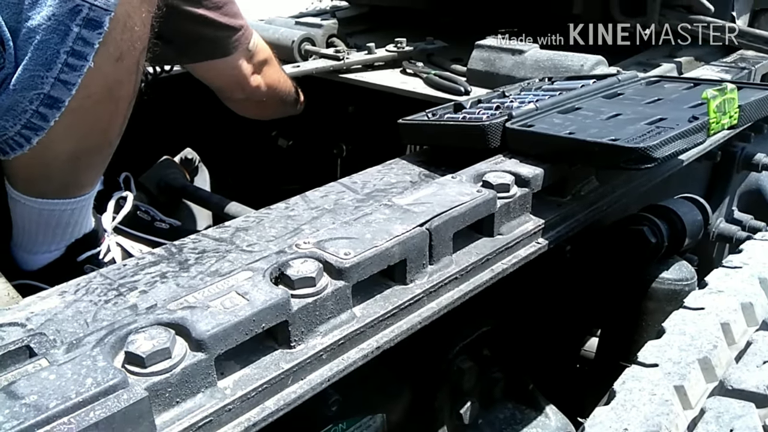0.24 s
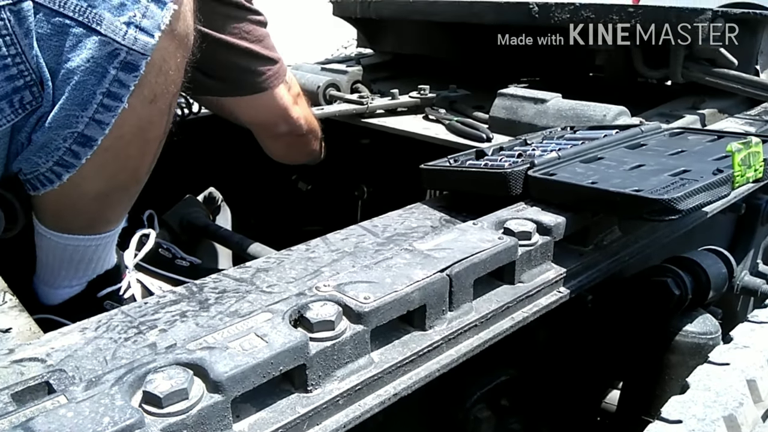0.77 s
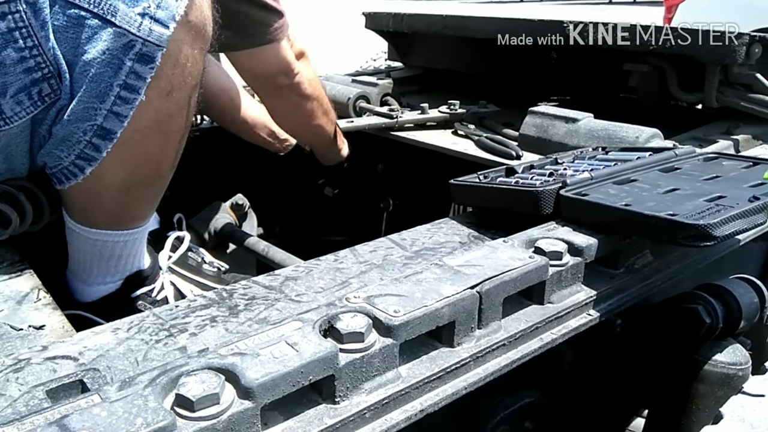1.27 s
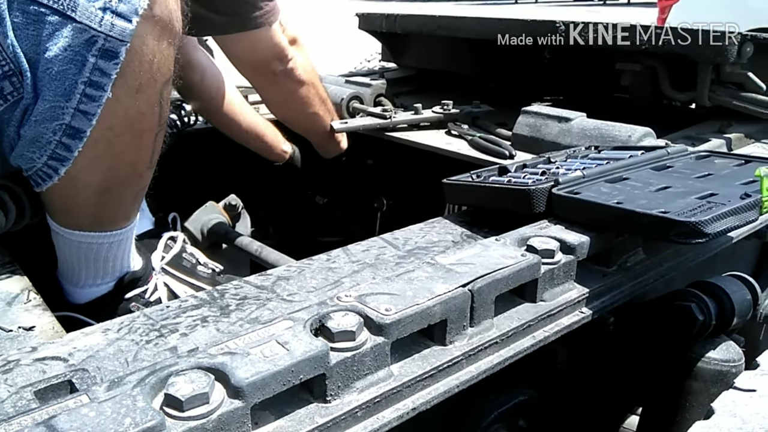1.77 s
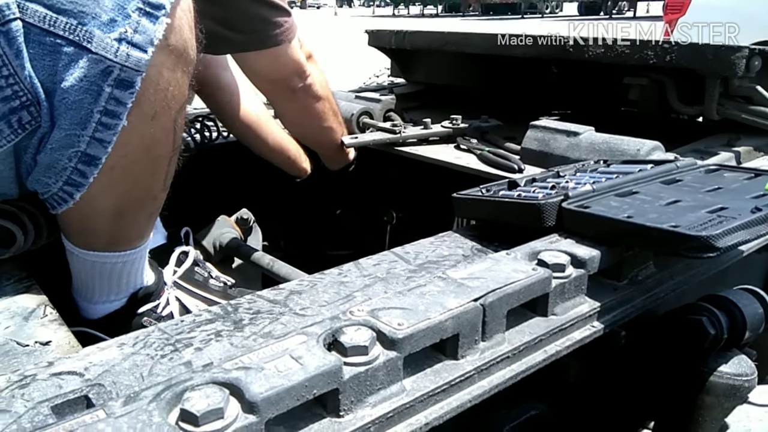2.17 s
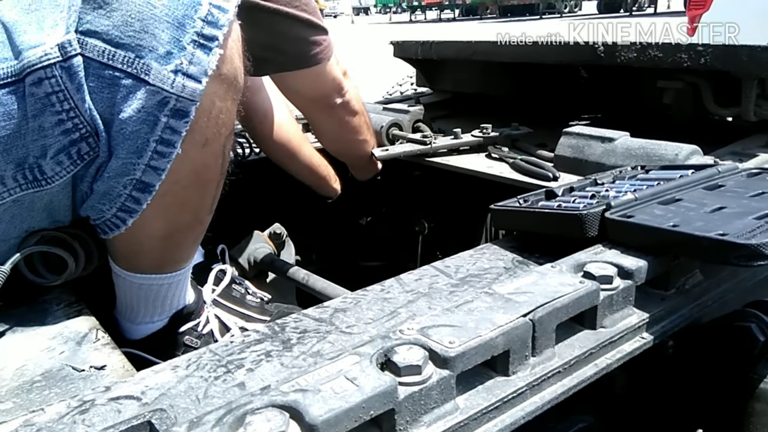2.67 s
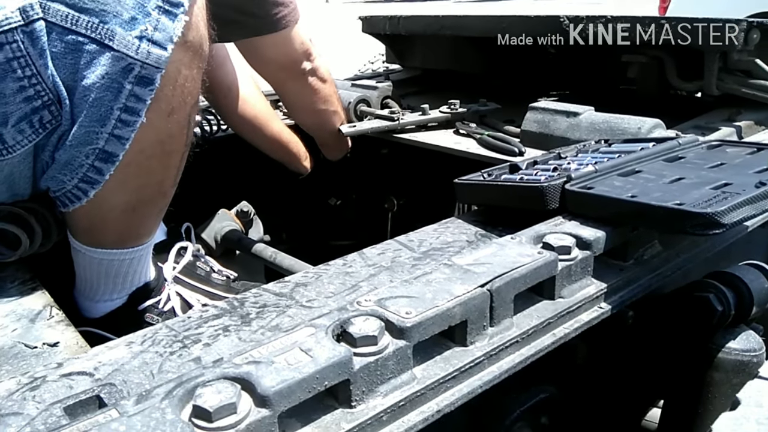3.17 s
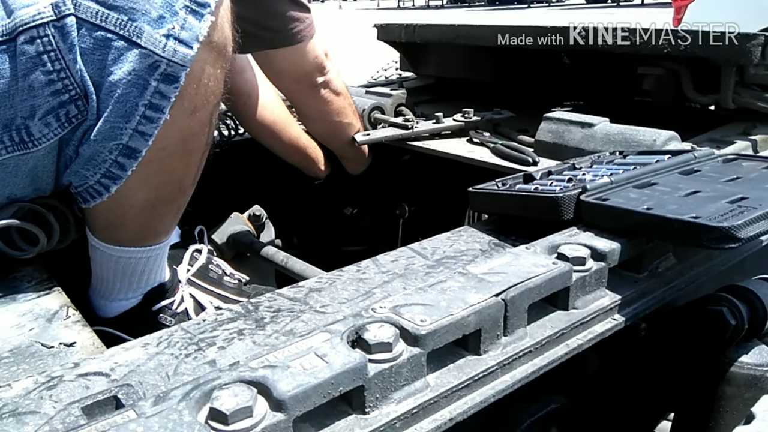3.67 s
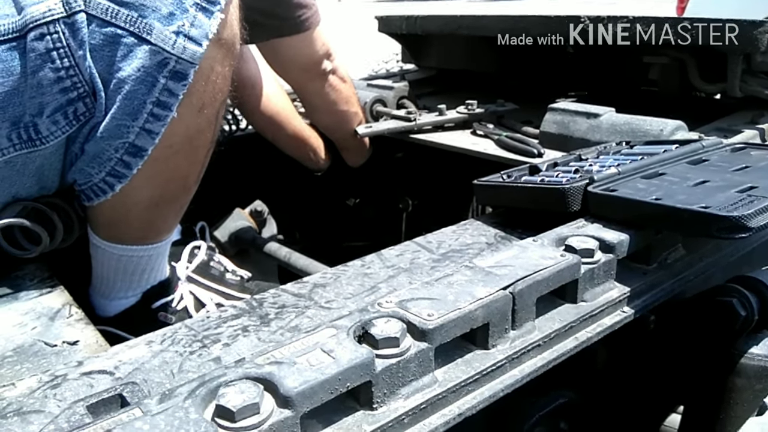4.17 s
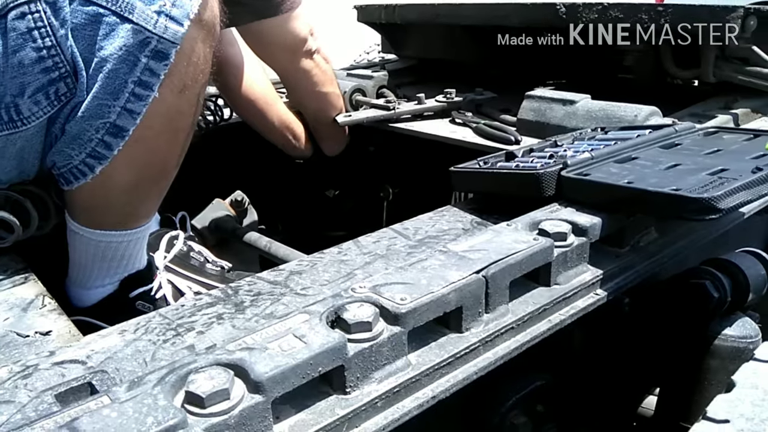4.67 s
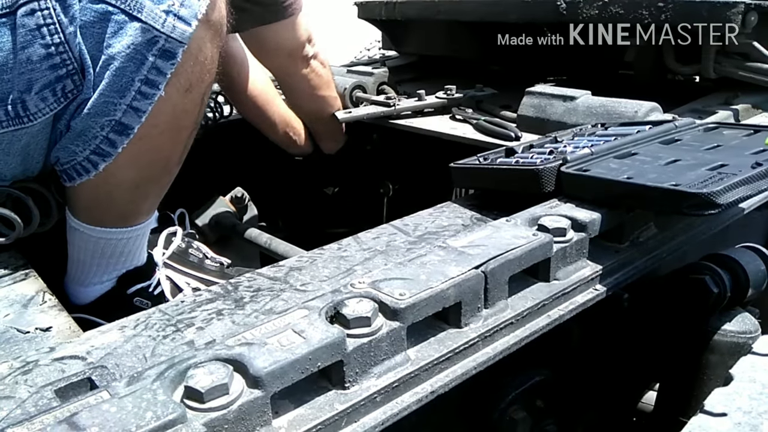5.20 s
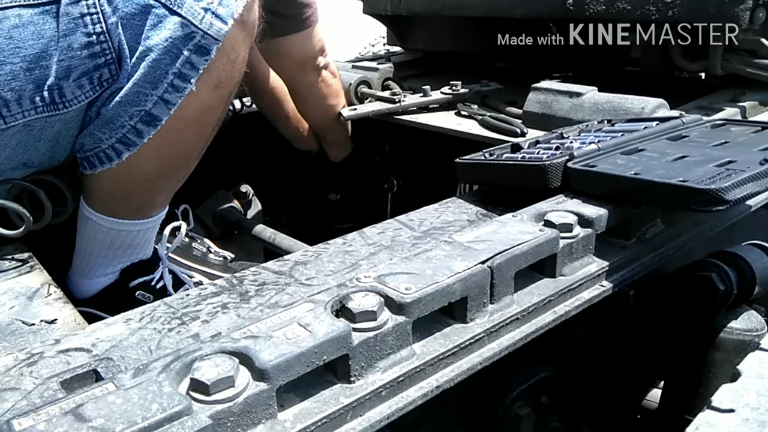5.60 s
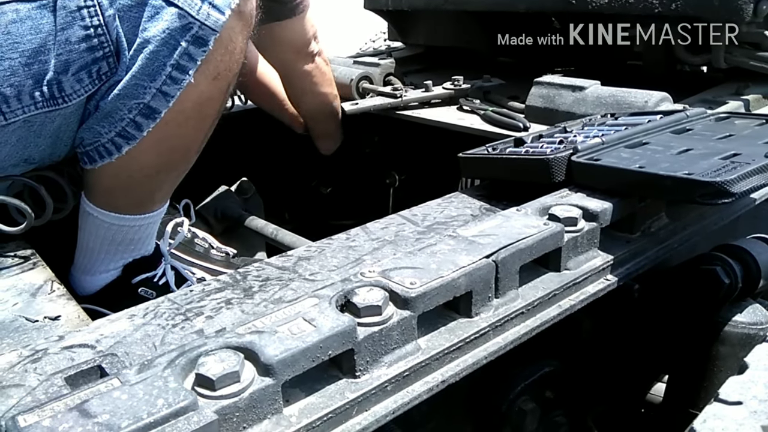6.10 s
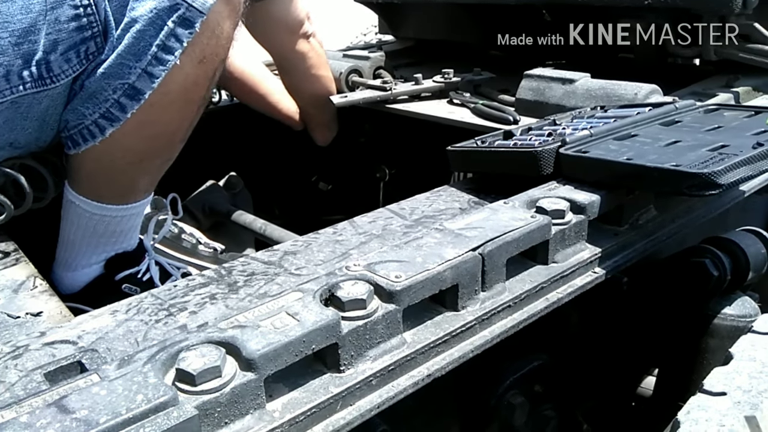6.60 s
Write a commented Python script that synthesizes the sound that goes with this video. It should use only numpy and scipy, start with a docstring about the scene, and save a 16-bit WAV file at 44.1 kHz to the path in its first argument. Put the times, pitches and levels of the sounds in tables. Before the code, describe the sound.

Close outdoor view of work on a truck frame: pressurised air hisses continuously from an open fitting, bright and slightly ringing, with quick spurts. Metal knocks come near the start, a clatter just after one second and a ringing wrench clank before two. Wind thumps the unprotected stereo microphone, heaviest between one and three and a half seconds. Near the end the hiss turns spittier as a hand deflects the jet.

```python
"""Compressed air hisses from a loose suspension line on a truck, near a hand-held camera with two microphone ports.
The hiss is shaped noise: a free jet, a ringing fitting, an edge hiss, short spurts and spray off a hand.
A breeze buffets each port in its own way, with overlapping small eddies and single strong puffs.
A wrench and fittings knock on the frame: blows and chatter drive its resonances. A faint yard noise lies under it all."""
import sys
import numpy as np
from scipy import signal
from scipy.fft import rfft, irfft, next_fast_len
from scipy.io import wavfile
from scipy.ndimage import uniform_filter1d, map_coordinates

SR = 44100
rng = np.random.default_rng(int(sys.argv[2]) if len(sys.argv) > 2 else 0)


def transcribe(signal):
    """Save signal, clipped to [-1, 1], as a 16-bit WAV file at the path in sys.argv[1]."""
    frames = np.atleast_2d(signal).T
    limited = np.clip(frames, -1, 1)
    pcm = np.round(limited * 32767).astype(np.int16)
    wavfile.write(sys.argv[1], SR, pcm)


N = 302064  # length of the scene in samples

# Colour of the free jet: [f/Hz, relative level/dB]
JET_COLOUR = [(710, -32), (1200, -44), (1700, -22.5), (1950, -30), (2300, -24.5), (3100, -6), (3800, -8.5),
              (4140, -6.5), (4860, -4), (5700, 3.5), (6420, -6.5), (7400, -12), (8560, -11), (10500, -15.5),
              (11300, -13), (15400, -23)]
# Share of the jet that passes hand and fitting freely: [f/Hz, level/dB]
FREE_SHARE = [(4600, 2.0), (5400, -13), (7200, 6), (8500, -0.5)]
# Narrow resonances of the gap in the frame: [f/Hz, width/Hz, level/dB before softening in gap_response]
GAP_MODES = [(2530, 60, -8), (3240, 40, -21), (3635, 37, -7), (4045, 45, -3), (4416, 45, -12),
             (4580, 70, -8), (5320, 70, -10), (5826, 75, -4), (6256, 35, -12), (6533, 50, -10),
             (7395, 30, -12), (8550, 61, -15), (9335, 120, -14)]
# How alike the hiss is at left and right: [f/Hz, likeness from 0 to 1]
HISS_LIKENESS = [(1500, 0.34), (3000, 0.52), (6000, 0.53), (9000, 0.93), (14000, .8)]
# Strength of the free jet over time: [t/s, level/dB before JET_DB]
FLOW = [(0.0, -54.5), (0.7, -52.5), (1.6, -50.5), (1.72, -51), (1.96, -49), (2.21, -52), (2.7, -48.5),
        (2.98, -52.5), (3.34, -51.5), (4.42, -51.5), (5.2, -51.5), (5.6, -53.5), (6.12, -55.5), (6.25, -54),
        (6.45, -54.5), (6.85, -56.5)]
# Moving centre of the edge hiss: [t/s, f/Hz]
EDGE_PITCH = [(5.3, 5800), (5.6, 5970), (5.8, 6100), (6.1, 6240), (6.25, 7340), (6.42, 6200), (6.85, 5900)]
# The jet catches an edge and sings briefly:
# [t/s of the peak, level/dB, f/Hz, time/s either side of the peak to drop 17 dB, left over right/dB]
SPURTS = [(.15, -55, 4800, 0.7, -5), (0.23, -62, 6800, 0.039, -2), (0.478, -53, 5630, 0.037, 6),
          (0.496, -55, 6800, 0.05, -9), (0.856, -45, 5550, 0.063, 6), (0.871, -52.5, 8100, 0.046, 7),
          (1.109, -46.5, 5200, 0.19, 7.5), (1.32, -42, 8080, 0.076, 0), (1.498, -47, 5400, 0.18, 15),
          (1.611, -41.5, 5400, 0.21, 2.5), (1.702, -42, 8150, 0.036, 1), (1.892, -46, 5850, 0.065, 11.5),
          (1.973, -52, 3600, 0.44, -7), (2.202, -55.5, 8700, 0.29, 0), (2.451, -47, 6060, 0.13, -6),
          (2.625, -48.5, 6070, 0.15, 9), (2.685, -51, 7200, .05, 11), (3.187, -48, 5400, 0.055, 9),
          (3.357, -43, 5600, 0.071, 5), (3.472, -49.5, 5730, 0.064, 13), (3.814, -48.5, 4000, 0.036, 4),
          (4.284, -45, 5470, 0.1, -2), (4.768, -51, 5670, 0.2, -4), (5.528, -50.5, 5400, 0.12, 14),
          (5.784, -45, 8400, 0.047, -3), (5.976, -47, 6600, 0.21, 6), (6.247, -54.5, 3150, 0.1, 0),
          (6.336, -36, 6720, 0.047, 2), (6.453, -44.5, 6200, 0.083, 6), (6.563, -42, 6140, 0.065, 6),
          (6.659, -43.5, 6000, 0.071, 8)]
# Air splashing off the hand: [t/s, level/dB]
SPRAY_LEVEL = [(5.3, -82), (5.55, -53.5), (5.8, -55), (6.1, -55), (6.25, -57), (6.42, -55), (6.85, -53)]
# Colour of that spray: [f/Hz, relative level/dB]
SPRAY_COLOUR = [(1000, -22), (1900, -4.5), (2400, -9), (3100, -9), (4200, -9), (6000, 0), (7300, 7),
                (8300, -17), (9300, -1), (10300, -11), (13300, -4), (15400, -13)]

# Spread of phase between the ports: [f/Hz, radians for a drift of 1]
PHASE_SPREAD = [(3000, 1.36), (6000, 0.31), (8000, 2.04), (10000, 1.4), (14000, 2.8)]
# Pitch that meets the ports in nearly opposite phase: [t/s, f/Hz]
OPPOSED_PITCH = [(0, 6960), (1.1, 7600), (3.5, 7440), (4.2, 6360), (5.25, 6550), (5.45, 7700), (5.7, 9000),
                 (6.1, 8940), (6.85, 8870)]
# How much earlier the hiss meets the left port: [t/s, lead/ms]
LEFT_LEAD = [(0, 0.059), (.8, 0.056), (1.3, 0.013), (4.4, 0.012), (4.9, 0.028), (5.6, 0.032)]

# Colour of the faint yard noise: [f/Hz, relative level/dB]
YARD_COLOUR = [(20, -11), (60, 7.5), (130, -4.5), (300, -12.5), (600, -21), (1100, -8.5), (1700, -12.5),
               (2300, -11), (3000, -10.5), (8000, -27.5)]

# Gusts of the breeze: [t/s of the start, length/s, air strength/dB before unsteadiness, port: 0 left, 1 right]
GUSTS = [(.42, 0.1, -60, 0), (1.23, 0.14, -40, 0), (1.48, 0.14, -35.5, 0), (1.76, 0.15, -41.5, 0),
         (1.96, 0.17, -36, 0), (2.3, .38, -36, 0), (2.73, 0.062, -40, 0), (2.88, 0.091, -45, 0),
         (3.04, 0.33, -38, 0), (3.35, 0.18, -58, 0), (.02, 0.034, -55.5, 1), (.36, 0.15, -48.5, 1),
         (.73, .05, -49, 1), (1.18, .07, -48, 1), (1.37, 0.1, -38, 1), (1.59, .15, -39, 1),
         (1.75, 0.11, -48, 1), (2.55, 0.083, -39.5, 1), (2.86, 0.074, -41.5, 1), (3.11, 0.3, -35.5, 1),
         (3.44, 0.25, -45.5, 1), (4.35, 0.075, -52, 1), (4.63, 0.2, -46.5, 1), (4.86, 0.35, -46.5, 1),
         (5.17, 0.3, -54, 1), (5.49, 0.097, -44, 1), (5.86, .04, -50.5, 1), (6.55, 0.078, -48.5, 1),
         (6.69, .15, -58.5, 1)]
# Air strength between gusts, before unsteadiness: [left port level/dB, right port level/dB]
CALM_DB = [-90, -66.5]
# Colour of the wind rumble: [f/Hz, relative level/dB]
RUMBLE_COLOUR = [(15, -52), (30, -44), (48, -4), (70, 1.5), (130, -3), (220, -19), (350, -59), (600, -96),
                 (1500, -85)]
# Colour of the fine turbulence: [f/Hz, relative level/dB]
FLUTTER_COLOUR = [(60, -12), (170, 5), (280, 4), (430, -15.5), (650, -22), (1000, -63), (2500, -91)]
# The strongest eddies: [t/s, level/dB before the thump and wake offsets, passing rate/Hz, port: 0 left, 1 right]
PUFFS = [(0.153, -35, 80, 1), (0.236, -44, 100, 1), (.307, -25.5, 150, 1), (0.647, -42, 69.6, 1),
         (.857, -28, 127, 1), (1.295, -19, 128, 0), (1.311, -21, 283, 0), (1.319, -18.5, 124, 0),
         (1.544, -20, 179, 0), (1.568, -17.5, 152, 0), (1.744, -22, 118, 0), (1.968, -23.5, 145, 0),
         (2.028, -21.5, 126, 0), (2.042, -24, 242, 0), (2.063, -25, 150, 0), (2.244, -23, 98, 1),
         (2.304, -25.5, 135, 0), (2.407, -29, 171, 1), (2.441, -25.5, 90, 0), (2.487, -24, 140, 0),
         (2.517, -27, 250, 0), (2.579, -19, 241, 1), (2.624, -20, 181, 0), (2.764, -23.5, 123, 0),
         (2.908, -26, 143, 0), (2.912, -21, 130, 1), (2.944, -27, 177, 0), (3.018, -26.5, 150, 1),
         (3.074, -20, 131, 0), (3.096, -17, 158, 0), (3.132, -23.5, 252, 0), (3.135, -25.5, 155, 1),
         (3.176, -22, 150, 1), (3.235, -25, 90, 0), (3.27, -27, 257, 1), (3.294, -22.5, 163, 1),
         (3.319, -24, 100, 1), (3.352, -17, 420, 1), (3.377, -24.5, 240, 1), (3.387, -23, 144, 1),
         (3.613, -24, 119, 1), (3.72, -39.5, 120, 1), (3.787, -38.5, 112, 0), (3.907, -47, 110, 0),
         (4.289, -31, 125, 1), (4.315, -20.5, 224, 1), (4.875, -34.5, 105, 1), (4.921, -29.5, 107, 1),
         (5.025, -32.5, 106, 1), (5.053, -23.5, 167, 1), (5.508, -26.5, 136, 1), (5.561, -27.5, 126, 1),
         (6.825, -29.5, 158, 1)]

# Tools and fittings on the frame: [t/s, level/dB, hardness/dB (added to the clack, taken from the thud),
# thud f/Hz, time/s of the main 60 dB decay, wrench ring level/dB]
KNOCKS = [(.169, -41.5, -4, 760, 0.049, -65), (0.175, -49, -5.5, 370, 0.12, -74),
          (0.77, -61, -5, 384, 0.031, -80), (1.098, -68.5, -5, 815, 0.27, -73),
          (1.145, -54, 2, 700, 0.059, -80), (1.159, -48, -7.5, 277, 0.088, -80),
          (1.166, -43.5, 9, 303, 0.071, -69), (1.176, -48, 7, 280, .07, -56),
          (1.185, -48.5, -8.5, 275, 0.16, -58), (1.197, -51.5, 3, 270, 0.099, -55),
          (1.672, -60.5, 12, 300, 0.12, -65), (1.847, -51.5, -16, 318, 0.057, -41.5),
          (1.852, -52, -7, 620, 0.076, -33), (1.864, -58, -15.5, 402, 0.12, -33.5),
          (1.881, -61, -17, 590, 0.089, -38), (3.336, -64.5, -14, 895, 0.17, -54),
          (3.571, -62.5, -4, 945, 0.055, -75), (4.605, -64, -8, 355, 0.089, -80),
          (5.257, -61.5, 9, 385, 0.075, -74), (5.272, -62.5, -4, 380, 0.086, -71),
          (5.757, -59.5, -30.5, 219, 0.028, -90), (5.773, -59, -20, 514, 0.051, -90),
          (6.011, -63.5, 5.5, 600, 0.21, -70), (6.417, -56.5, 10, 376, 0.087, -80),
          (6.432, -56.5, -1, 400, 0.074, -78), (6.455, -65, 9, 400, 0.084, -78)]
# Resonances of the frame: [f/Hz, smallest width/Hz, level/dB]
FRAME_MODES = [(205, 30, 1), (262, 25, 0), (385, 30, 0), (528, 25, 3), (745, 90, -3), (820, 50, -4),
               (1035, 55, -5), (1205, 40, -8), (1435, 40, 1), (1680, 45, 2), (2190, 50, -11),
               (2520, 40, -11)]
# Resonances of the wrench: [f/Hz, width/Hz, level/dB]
WRENCH_MODES = [(339, 12, -13), (463, 12, -17), (593, 15, -16), (727, 12, -20), (974, 20, 0), (1022, 21, 0),
                (1205, 17, -15), (1890, 30, -14), (1994, 26, -12), (2541, 30, -27)]

# Hiss
JET_DB, FIZZ_DB = 4.5, -44  # jet body added to FLOW; finest fizz on its own
FITTING_DB, FITTING_WAVER_DB = -49.5, 1.1  # ringing of the open fitting, and its flutter
EDGE_DB, EDGE_WAVER_DB = -55, 1.5  # edge hiss while the jet runs free, and its flutter
GRAZE_S, GRAZE_RISE_S = 5.34, 0.27  # a hand moves into the jet and stays: start, approach
GRAZE_DB, GRAZE_SHADE_DB = 7.5, 1.5  # the hand raises the edge hiss and shades the fitting
LEFT_DB, GRAZE_LEFT_DB, JET_LEFT_DB = 3, 2.5, -1  # left over right: deflected air, hand's addition, free jet
SPURT_WIDTH = 0.29  # width of the resonance, as a share of its centre; it is then applied three times

# Scattering
OPPOSED_WIDTH_HZ, OPPOSED_TURN = 270, 2.44  # breadth of the opposed pitch; radians at its centre
RESTLESS_DB = 1.3  # quick patches of louder and softer hiss as the jet wanders
FINE_RIPPLE_DB = 4  # crossing echoes ripple the spectrum
BANDS_DB = 1.4  # broad bands that shift as the arms move, unlike at the two ports
RIPPLE_FULL_HZ = 3540  # longer waves bend round the arms and ripple less

# Breeze
GUST_RISE_DB_PER_S, GUST_FALL_DB_PER_S = 335, 268
GUSTINESS_DB, GUSTINESS_RATE = 7, 13  # largest unsteadiness of the air; its random points a second
PUFF_STIR_DB, PUFF_FADE_DB_PER_S = -8.5, 432  # air stirred up around each strong eddy
EDDY_DB, RUMBLE_DB, TORN_DB = 3.5, -4, -14  # eddies and rumble over air strength; torn air, before swirl sets it
EDDY_HZ = 103.5  # typical passing rate of a small eddy at an air strength of -45 dB
PUFF_DB, CORE_DB, WAKE_DB = -1, -14.5, -27  # thump over table level, core over thump, wake over table level
CORE_FASTER_HZ, WAKE_S = 159, 0.0061  # how much faster the core passes; rise and fall time of the wake

# Knocks
KNOCK_DB = -1  # middle register against the level of the contact
CLACK_HZ, CONTACT_HZ = 1630, 2600  # centre of the upper register; a contact excites little above the second
CHATTER_DB, CHATTER_RISE_S = 2, .0015  # chatter against a firm blow; its build-up in a firm contact
FIRM_DB, SOFTENING = -48, .75  # lighter contacts slide in: dB of longer rise for each dB below firm
RING_KICK_S = .022  # the chatter's push on the wrench drops 60 dB in this time, then the wrench rings freely


def amp(db):
    """Turn decibels into gain."""
    return 10 ** (np.asarray(db) / 20)


def unit(x):
    """Scale a sound to an average strength (rms) of 1."""
    return x / np.sqrt(np.mean(x ** 2) + 1e-20)


def along(points, hz):
    """Read values from rows of frequency and value, on a log frequency axis."""
    f, v = np.transpose(points)
    return np.interp(np.log(hz + 1), np.log(f + 1), v)


def curves(rows):
    """Give one value per sample for each column after the time."""
    s, *cols = np.transpose(rows)
    return [np.interp(np.arange(N) / SR, s, c) for c in cols]


def wobble(rate):
    """Draw a smooth random curve through the given number of random points a second."""
    knots = rng.standard_normal(int(N * rate / SR) + 4)
    return map_coordinates(knots, [np.arange(N) * rate / SR], order=2)


def filtered(x, response):
    """Multiply the spectrum of a sound by a response, with room for ringing before the result is cut to length."""
    n = x.shape[-1]
    m = next_fast_len(n + SR // 4)
    return irfft(rfft(x, m) * response(np.fft.rfftfreq(m, 1 / SR)), m)[..., :n]


def resonance(f, centre_hz, width_hz):
    """Respond like one ringing mode, strongest at its centre."""
    return 1j * f * width_hz / (centre_hz ** 2 - f * f + 1j * f * width_hz)


def noise(gain, likeness, size=N):
    """Make stereo noise of rms 1 from a shared middle and an opposed side, mixed to set left-right likeness."""
    def spread(f):
        turn = np.arccos(np.clip(along(likeness, f), -1, 1)) / 2
        return gain(f) * np.array([np.cos(turn), np.sin(turn)])

    mid, side = filtered(rng.standard_normal((2, size)), spread)
    return unit(np.array([mid + side, mid - side]))


def add(track, s, sound):
    """Mix a sound into a track from time s."""
    part = track[..., max(round(s * SR), 0):][..., :sound.shape[-1]]
    part += sound[..., :part.shape[-1]]


def panned(x, left_db):
    """Raise the left side of a stereo sound over its right."""
    return np.array([x[0] * amp(left_db / 2), x[1] * amp(-left_db / 2)])


def gliding(x, pitch, width_hz):
    """Pass noise through a resonance whose centre follows rows of time and frequency."""
    f, t, z = signal.stft(x, SR, nperseg=512)
    centre_hz = np.interp(t, *np.transpose(pitch))
    z = z * abs(resonance(f[:, None], centre_hz, width_hz)) ** 3
    return unit(signal.istft(z, SR, nperseg=512)[1][:, :N])


def leak():
    """Escaping air makes a free jet, deflected hiss, spurts and spray; surroundings then scatter them together."""
    graze = np.clip((np.arange(N) / SR - GRAZE_S) / GRAZE_RISE_S, 0, 1)
    deflected = open_fitting(graze) + edge_hiss(graze)
    air = free_jet() + hand_spray() + panned(deflected, LEFT_DB + GRAZE_LEFT_DB * graze)
    return scattered(air * amp(.65 * wobble(35)) + spurts())


def gap_response(f):
    """The gap in the frame adds many narrow resonances to an even base, by power."""
    # table levels count at 0.3 of their size, plus 1 dB
    peaks = sum(abs(amp(.3 * db + 1) * resonance(f, hz, width)) ** 2 for hz, width, db in GAP_MODES)
    return np.sqrt(.33 + peaks)


def free_jet():
    """Turbulent air makes broad noise that follows the flow; its finest fizz has a separate level."""
    flow_db, = curves(FLOW)
    jet = noise(lambda f: amp(along(JET_COLOUR, f) + along(FREE_SHARE, f)) * gap_response(f), HISS_LIKENESS)
    fizz = filtered(jet, lambda f: 1 / (1 + (8200 / (f + 1)) ** 10))  # keeps the top, from about 8.2 kHz
    # the finest fizz comes from the orifice itself and hardly feels the hands
    return amp(flow_db + JET_DB) * panned(jet - fizz, JET_LEFT_DB) + amp(FIZZ_DB) * fizz


def open_fitting(graze):
    """Rushing air makes the open fitting resonate; the level flutters and the hand shades it."""
    tone = noise(lambda f: abs(resonance(f, 5493, 850)) ** 2 * gap_response(f), HISS_LIKENESS)
    return amp(FITTING_DB - GRAZE_SHADE_DB * graze + FITTING_WAVER_DB * wobble(14)) * tone


def edge_hiss(graze):
    """Air striking an edge makes a fluttering hiss of gliding pitch, louder when the hand is in the jet."""
    hiss = gliding(noise(np.ones_like, HISS_LIKENESS), EDGE_PITCH, width_hz=3300)
    return amp(EDGE_DB + GRAZE_DB * graze + EDGE_WAVER_DB * wobble(16)) * hiss


def spurts():
    """The jet briefly catches an edge: narrow hiss swells and fades in a bell-shaped curve."""
    out, t = np.zeros((2, N)), np.arange(-SR // 3, SR // 3) / SR
    for s, db, hz, length, left_db in SPURTS:
        hiss = noise(lambda f: abs(resonance(f, hz, SPURT_WIDTH * hz)) ** 3, HISS_LIKENESS, size=len(t))
        swell = np.exp(-2 * (t / length) ** 2)
        add(out, s + t[0], amp(db) * swell * panned(hiss, left_db))
    return out


def scattered(x):
    """Arms and frame rails scatter the hiss: each pitch meets the ports at its own phase, drifting as hands move."""
    f, t, z = signal.stft(x, SR, nperseg=2048)

    def field(span_hz, rate):
        """Vary smoothly and randomly over frequency and time."""
        knots = rng.standard_normal((384, 128))
        places = np.meshgrid(f / span_hz, t * rate, indexing="ij")
        return map_coordinates(knots, places, order=2, mode="wrap")

    drift = field(520, 1.2) + .9 * field(130, 1.2)
    opposed_hz = np.interp(t, *np.transpose(OPPOSED_PITCH))
    opposed = np.exp(-((f[:, None] - opposed_hz) / OPPOSED_WIDTH_HZ) ** 2)
    phase = along(PHASE_SPREAD, f)[:, None] * drift * (1 - opposed) + OPPOSED_TURN * opposed
    lead_s = np.interp(t, *np.transpose(LEFT_LEAD)) / 1000
    phase += 2 * np.pi * np.minimum(f, 5000)[:, None] * lead_s  # the lead's phase stops growing above 5 kHz

    shared_db = RESTLESS_DB * field(650, 18) + FINE_RIPPLE_DB * field(60, 4)
    ripple_db = shared_db + BANDS_DB * np.array([field(330, 2), field(330, 2)])
    gain = amp(ripple_db * np.minimum(f / RIPPLE_FULL_HZ, 1)[:, None])
    turned = z * gain * np.exp(.5j * np.array([phase, -phase]))  # half the phase to each port
    return signal.istft(turned, SR, nperseg=2048)[1][:, :N]


def yard_noise():
    """The yard adds faint, steady noise of one fixed colour."""
    return amp(-68) * noise(lambda f: amp(along(YARD_COLOUR, f)), [(100, .6), (1500, .6)])


def breeze():
    """Small eddies cross each port separately, faster in stronger air, with rumble and fine torn turbulence."""
    speed_db = air_speed()
    lumps, t = np.zeros((2, N)), np.arange(-SR // 25, SR // 25) / SR
    slots = np.arange(0, N / SR, 1 / 45)  # 45 eddies a second, each at a shifted time
    for port in range(2):
        for slot, (late, size, pace, skew) in zip(slots, rng.standard_normal((len(slots), 4))):
            s = np.clip(slot + 0.00678 * late, 0, (N - 1) / SR)
            db = speed_db[port, int(s * SR)]
            hz = EDDY_HZ * np.exp(.66 * np.tanh(pace) + .01 * (db + 45))
            level = amp(db + EDDY_DB + 5 * np.tanh(size))
            add(lumps[port], s + t[0], level * eddy(t, hz, skew))
    rumble = noise(lambda f: amp(along(RUMBLE_COLOUR, f)), [(100, 0.13)])
    flutter = noise(lambda f: amp(along(FLUTTER_COLOUR, f)), [(100, 0.0046)])
    # fine turbulence is torn off the eddies, much more from strong ones
    swirl = np.sqrt(abs(uniform_filter1d(lumps ** 2, size=550, axis=1)))  # strength over about 12 ms
    torn = amp(TORN_DB) * swirl * (swirl / .01) ** .4 * flutter
    return lumps + amp(speed_db + RUMBLE_DB) * rumble + torn


def air_speed():
    """Air strength in dB at each port: calm, gusts that rise, hold and fall, and a stir around each puff."""
    t = np.arange(N) / SR
    speed_db = [np.full(N, float(db)) for db in CALM_DB]
    for s, length, db, port in GUSTS:
        rise_db = GUST_RISE_DB_PER_S * np.maximum(s - t, 0)
        fall_db = GUST_FALL_DB_PER_S * np.maximum(t - s - length, 0)
        speed_db[round(port)] = np.maximum(speed_db[round(port)], db - rise_db - fall_db)
    speed_db = [db + GUSTINESS_DB * np.tanh(wobble(GUSTINESS_RATE)) for db in speed_db]
    for s, db, _, port in PUFFS:
        stir_db = db + PUFF_STIR_DB - PUFF_FADE_DB_PER_S * abs(t - s)
        speed_db[round(port)] = np.maximum(speed_db[round(port)], stir_db)
    return np.array(speed_db)


def eddy(t, hz, skew):
    """A whirl of air crossing a port makes a dip of pressure between two swells, made uneven by skew."""
    return -np.cos(2 * np.pi * hz * t + skew) / np.cosh(hz * t / 0.35)


def puffs():
    """Strong eddies thump on one port; a tight, faster core makes each snap, and a short torn wake adds noise."""
    out, t = np.zeros((2, N)), np.arange(-SR // 20, SR // 20) / SR
    swell = np.exp(-np.abs(t - .001) / WAKE_S)  # the wake peaks 1 ms after the eddy's middle
    for s, db, hz, port in PUFFS:
        skew = rng.normal(0, 0.66)
        thump = eddy(t, hz, skew) + amp(CORE_DB) * eddy(t, hz + CORE_FASTER_HZ, skew)
        wake_hz = 130 + 0.86 * hz
        wake = filtered(swell * rng.standard_normal(len(t)), lambda f: resonance(f, wake_hz, 0.61 * wake_hz) ** 3)
        add(out[round(port)], s + t[0], amp(db + PUFF_DB) * thump + amp(db + WAKE_DB) * unit(wake))
    return out


def knocks():
    """A blow and brief chatter ring the frame in three registers, and the wrench at a level set for each contact."""
    out, t = np.zeros((2, N)), np.arange(SR // 2) / SR

    def contact_softening(f):
        return (1 + 1j * f / CONTACT_HZ) ** 3

    def wrench(f):
        return sum(amp(db) * resonance(f, hz, width) for hz, width, db in WRENCH_MODES) / contact_softening(f)

    for s, level_db, hard_db, thud_hz, t60, ring_db in KNOCKS:
        damped_hz = np.log(1000) / np.pi / t60  # a short, pressed contact also damps the frame

        def frame(f):
            # neighbouring modes push in opposite directions
            return .4 + sum((-1) ** k * amp(db) * resonance(f, hz, max(width, damped_hz))
                            for k, (hz, width, db) in enumerate(FRAME_MODES))

        def register(hz, width_hz):
            return lambda f: frame(f) * resonance(f, hz, width_hz) ** 2 / contact_softening(f)

        fade = amp(-60 * t / t60) + amp(-38 - 60 * t / .4)  # the yard answers faintly
        softness = amp(SOFTENING * max(FIRM_DB - level_db, 0))
        build_up = 1 - np.exp(-t / (CHATTER_RISE_S * softness))
        bodies = [(level_db - hard_db, register(thud_hz, 0.46 * thud_hz)),  # thud
                  (level_db + KNOCK_DB, register(745, 900)),  # knock
                  (level_db + hard_db, register(CLACK_HZ, 1500)),  # clack
                  (ring_db, wrench)]
        for db, body in bodies:
            # half the chatter's power is shared by the ports, half is separate
            chatter = rng.standard_normal(len(t)) + rng.standard_normal((2, len(t)))
            drive = fade * build_up * chatter
            drive *= amp(CHATTER_DB) / np.linalg.norm(drive[0])
            if body is wrench:
                drive *= amp(-60 * t / RING_KICK_S)
            drive[:, 0] += 1 / softness  # the blow
            # the decay's strength turns the even scaling into a level at the contact
            add(out, s, amp(db) * unit(filtered(drive, body)) * np.sqrt(np.mean(fade ** 2)))
    return out


def hand_spray():
    """Air splashing off the hand makes coloured noise that follows its own level curve."""
    spray_db, = curves(SPRAY_LEVEL)
    return amp(spray_db) * noise(lambda f: amp(along(SPRAY_COLOUR, f)), HISS_LIKENESS)


def scene():
    """The leak and the work on it sound in the breeze, over the faint noise of the yard."""
    return leak() + yard_noise() + breeze() + puffs() + knocks()


def record(dry):
    """The camera thins the deepest bass, below about 42 Hz, and keeps nothing from 15.6 kHz up."""
    return filtered(dry, lambda f: (f < 15600) / np.sqrt(1 + (42 / (f + 1)) ** 6))


dry = scene()
out = record(dry)
transcribe(out)
```